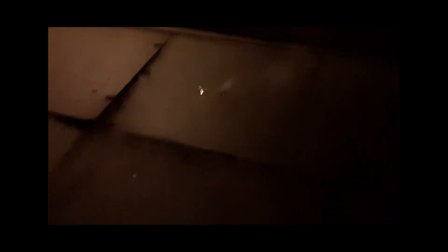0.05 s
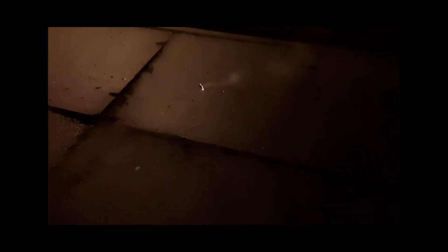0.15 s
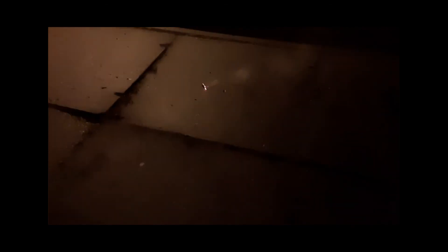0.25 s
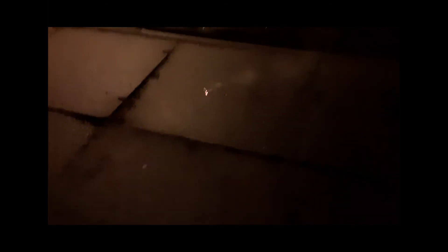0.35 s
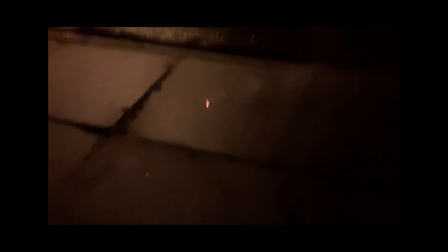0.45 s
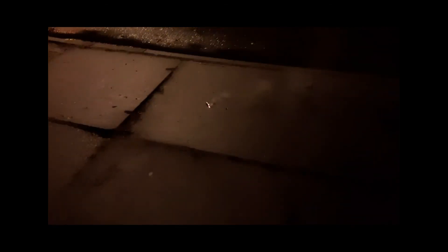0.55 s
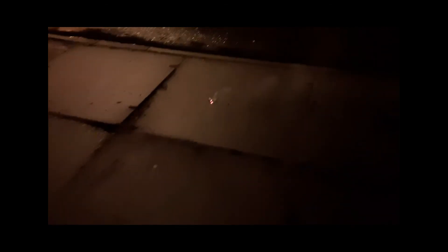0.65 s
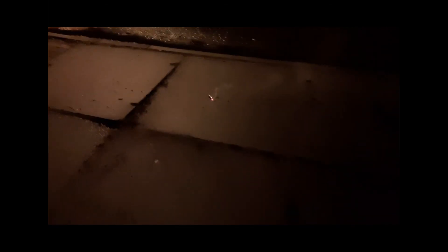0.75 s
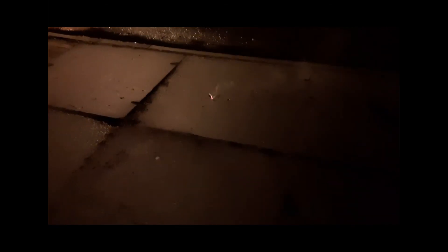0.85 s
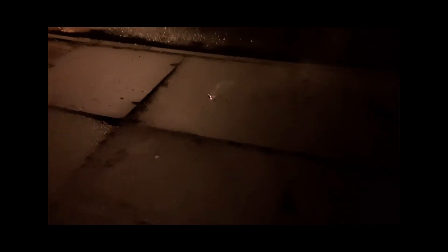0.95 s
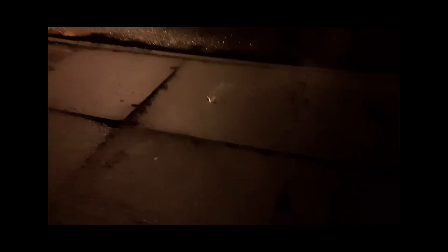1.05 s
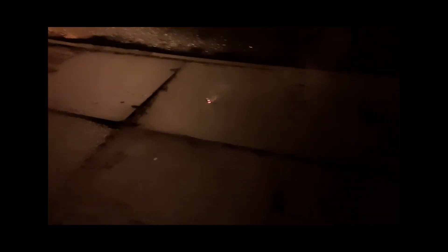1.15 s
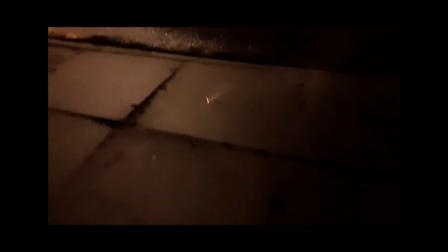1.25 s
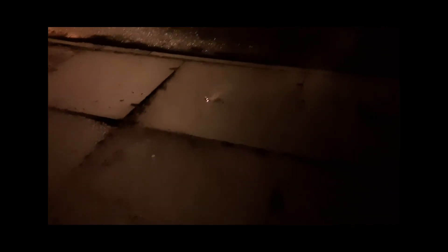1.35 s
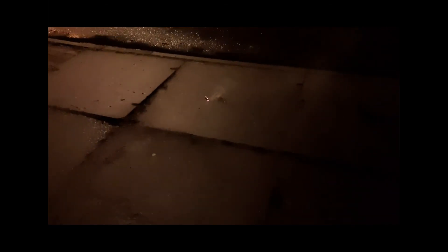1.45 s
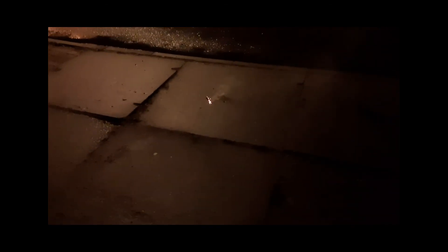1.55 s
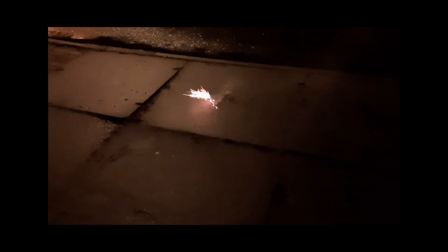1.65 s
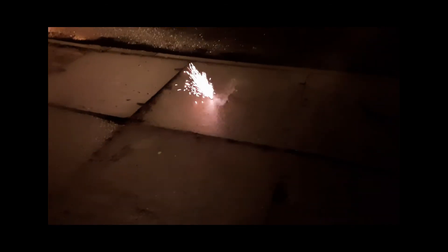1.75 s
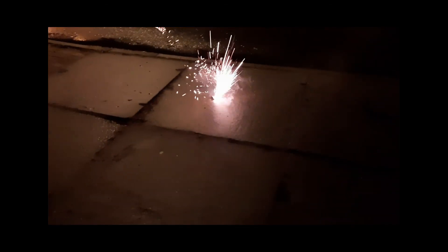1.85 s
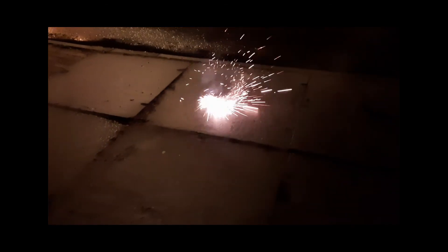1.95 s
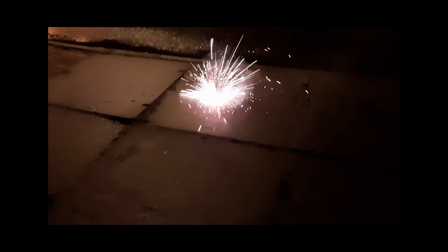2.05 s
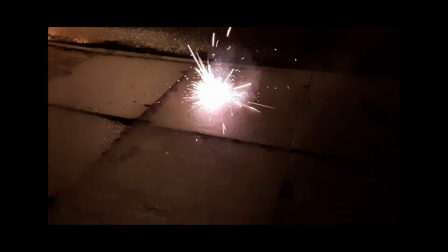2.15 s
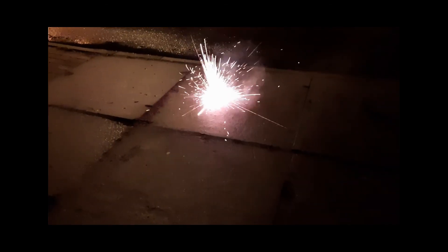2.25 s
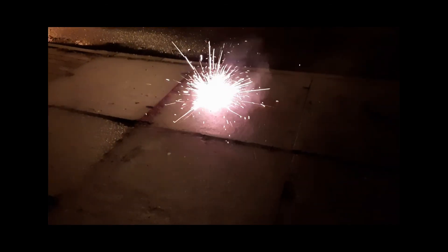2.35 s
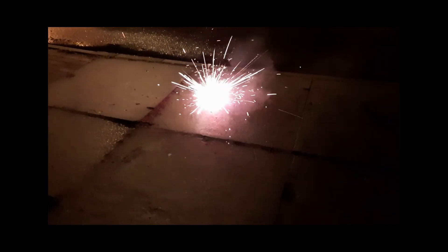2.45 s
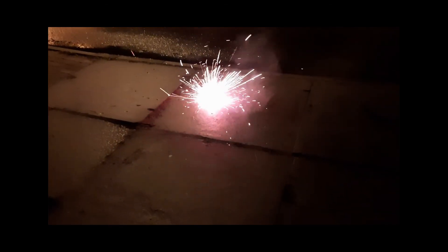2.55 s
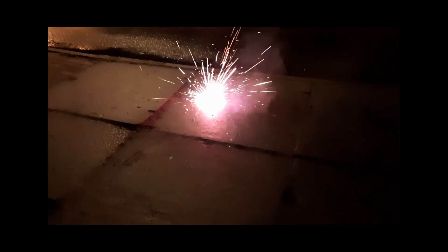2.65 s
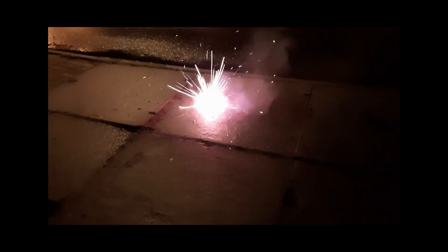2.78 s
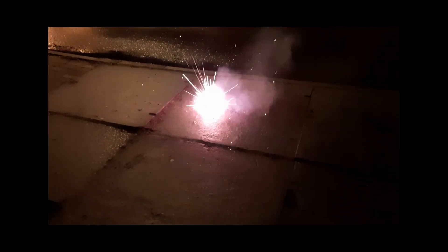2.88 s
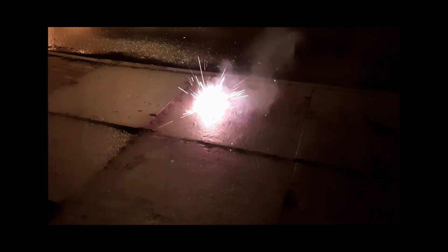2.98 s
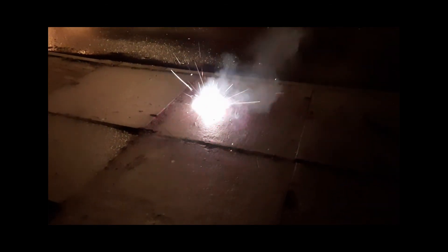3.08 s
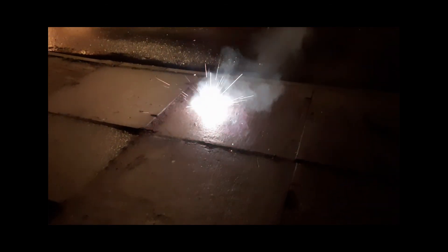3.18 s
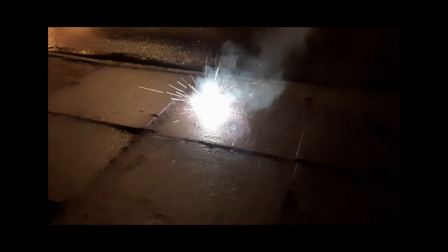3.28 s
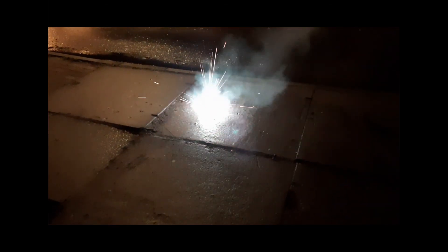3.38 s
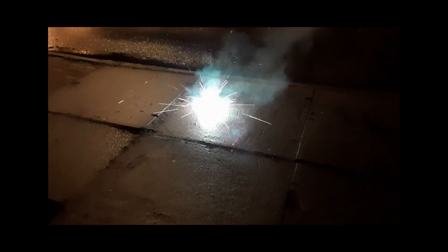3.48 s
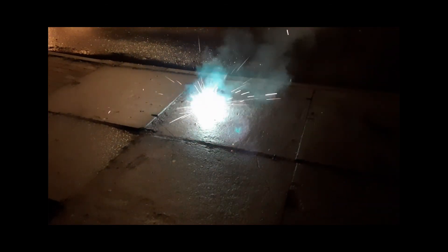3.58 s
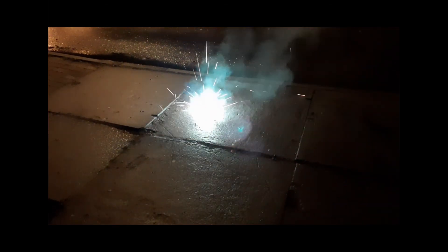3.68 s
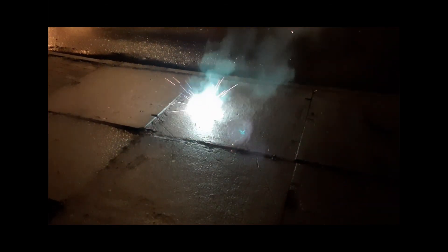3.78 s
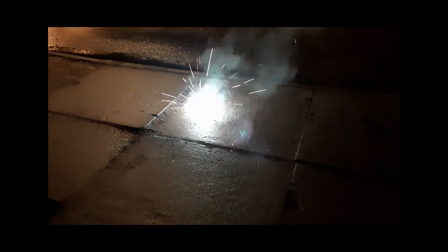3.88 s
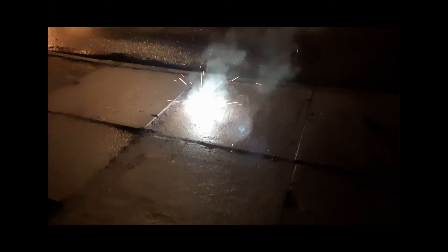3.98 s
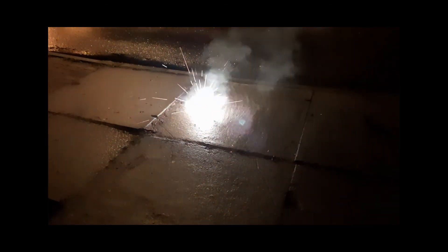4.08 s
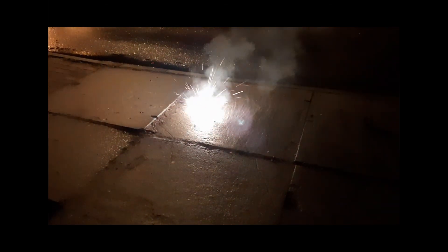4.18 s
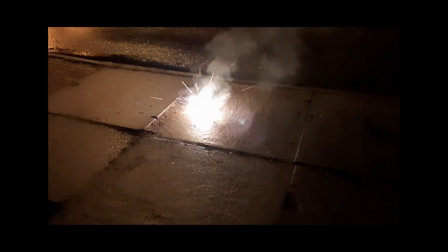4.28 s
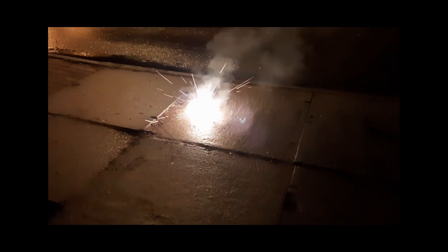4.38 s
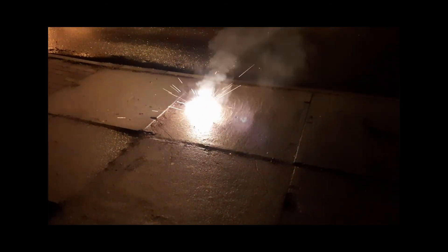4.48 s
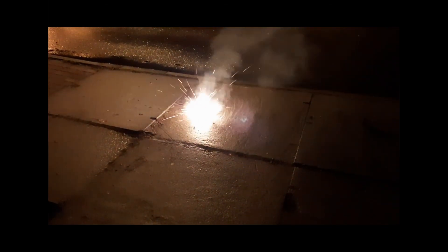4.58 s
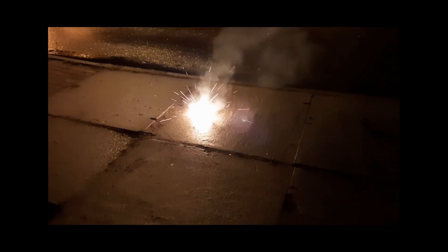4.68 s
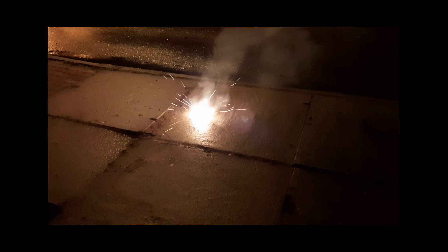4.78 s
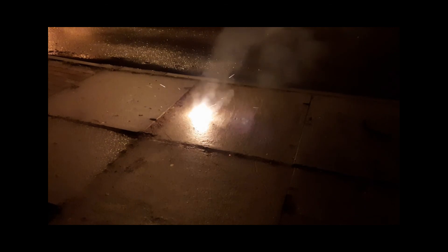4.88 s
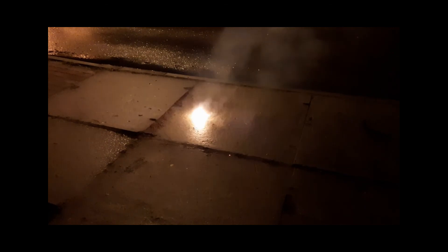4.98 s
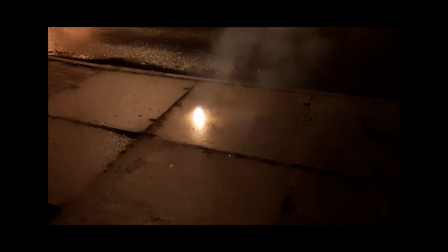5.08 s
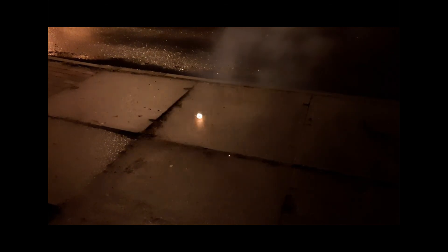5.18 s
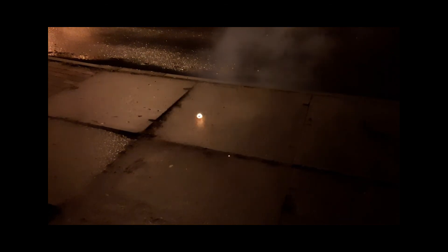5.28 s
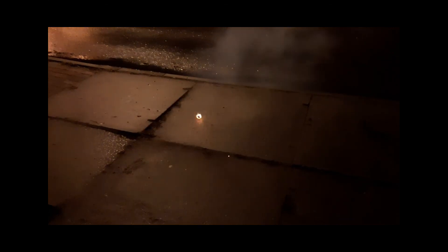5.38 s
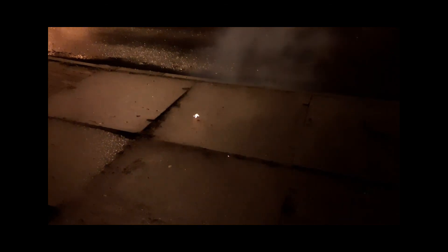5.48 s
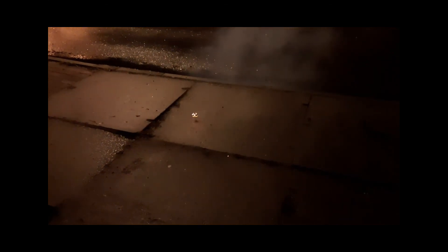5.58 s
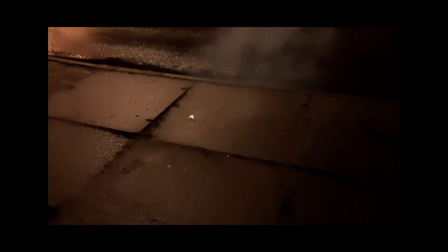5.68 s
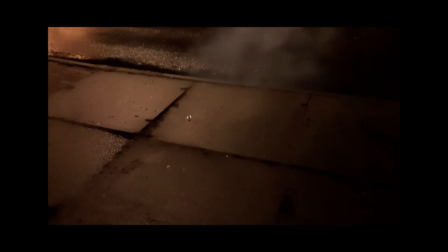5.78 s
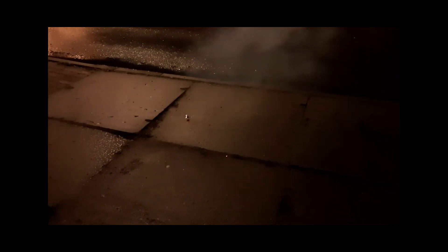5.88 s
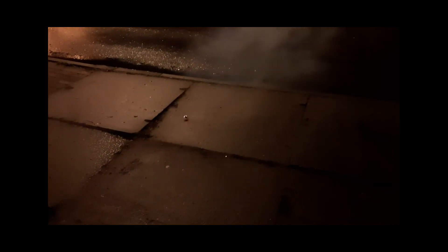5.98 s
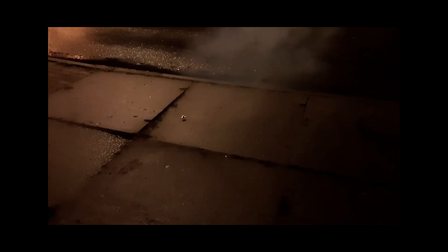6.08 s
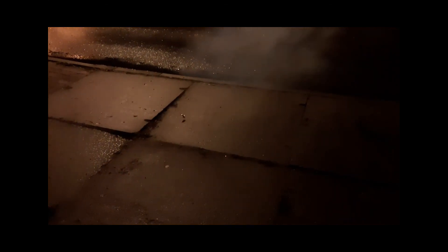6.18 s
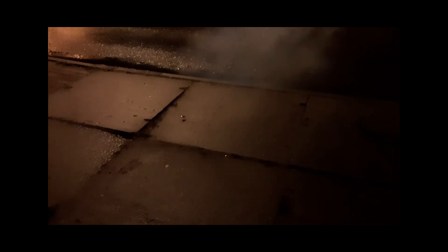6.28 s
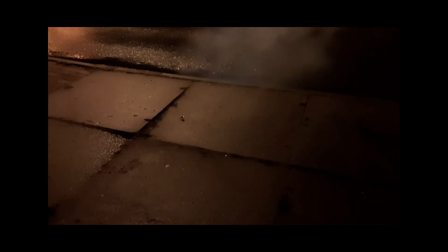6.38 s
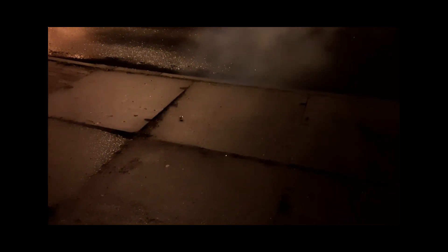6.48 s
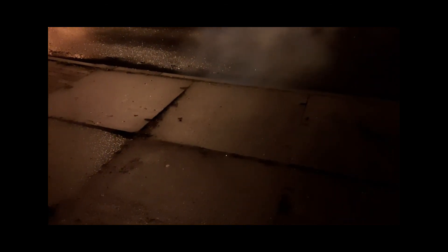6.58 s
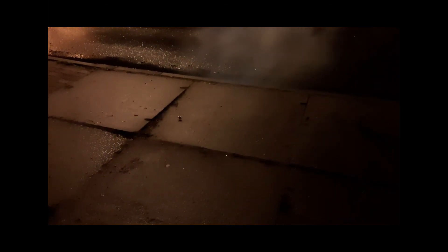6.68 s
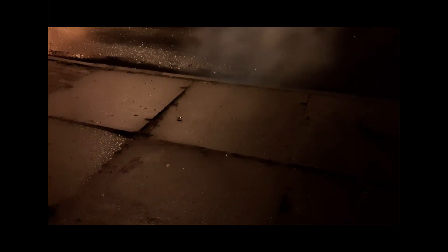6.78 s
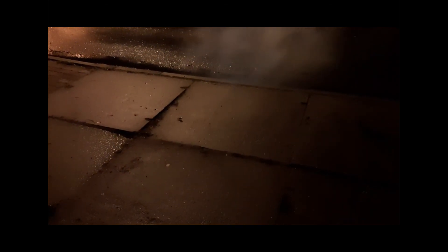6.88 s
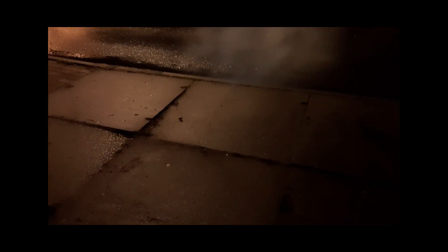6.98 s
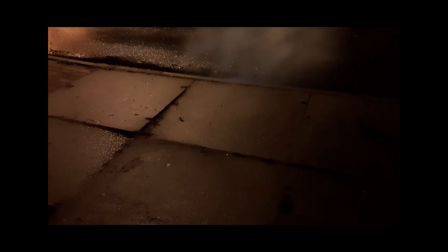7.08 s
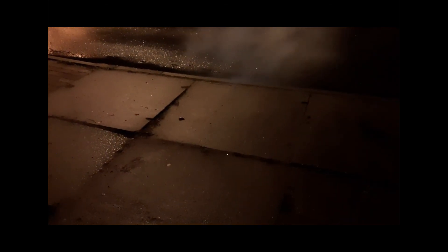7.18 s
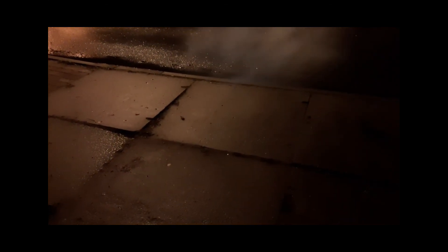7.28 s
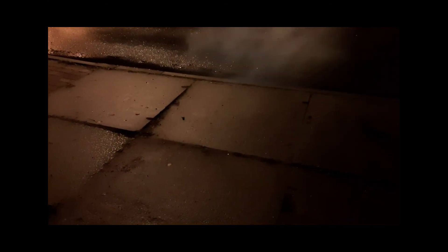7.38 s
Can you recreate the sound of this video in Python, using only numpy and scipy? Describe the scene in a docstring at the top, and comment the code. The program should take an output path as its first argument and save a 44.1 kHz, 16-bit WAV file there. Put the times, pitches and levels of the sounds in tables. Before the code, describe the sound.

A small spinning firework pops alight on wet paving, hisses and buzzes loudly in a fast whirl, then sputters out to faint ticks.

```python
"""Wet paving at night, where a ground spinner firework goes off: noise shaped by filters makes its gas, random impulses its sparks.
The fuse fizzes, the charge catches, and the tube tumbles, then spins up. Its hissing jet is modulated by each turn and wobble,
and sines locked to the rotation make a low hum. It dies to a fizzle and a few ticks, which are short ringing cracks of noise.
Wind buffets the two microphone ports in turn, as low noise and pressure pulses; a motor, a few sine lines, whines far away."""
import sys
import numpy as np
from scipy import signal
from scipy.fft import rfft, irfft, next_fast_len
from scipy.io import wavfile
from scipy.ndimage import map_coordinates

SR = 44100
rng = np.random.default_rng(int(sys.argv[2]) if len(sys.argv) > 2 else 0)


def wav_record(signal):
    """Record a signal, one row per channel, as 16-bit PCM in the file named by sys.argv[1]."""
    frames = np.transpose(np.atleast_2d(signal))
    bounded = np.clip(frames, -1, 1)
    # unit amplitude maps onto the largest positive 16-bit level
    quanta = np.round(bounded * 32767).astype(np.int16)
    wavfile.write(sys.argv[1], SR, quanta)


N = 328567

# rotation of the tube: (time [s], spin [turns/s])
SPIN_RATE = [(1.9, 24), (2.17, 31), (2.5, 112), (2.66, 151), (3.35, 164), (4.3, 149), (4.7, 141),
             (5.3, 120), (5.75, 100), (6.1, 90)]
# the strongest eddies of the wind:
# (time [s], relative level [dB], left minus right [dB], pitch of the pop [Hz])
WIND_EDDIES = [(.119, -27.5, -32, 168), (.178, -33.5, -20, 200), (.394, -26, -18, 195),
               (.581, -29.5, 25, 237), (.707, -33, 20, 170), (.735, -27.5, 20, 238), (.778, -44, 20, 300),
               (.877, -33.5, 20, 170), (.952, -29.5, 26, 290), (.991, -28, 23, 220),
               (1.007, -25.5, 27, 318), (1.051, -27, 23, 377), (1.077, -26.5, 7, 374),
               (1.148, -24.5, 24, 292), (1.222, -26, -14, 130), (1.241, -29.5, -14, 130),
               (1.259, -29.5, 0, 300), (1.345, -20.5, -25, 207), (1.479, -29.5, -20, 130),
               (1.543, -27.5, -20, 150), (1.89, -29, -25, 110), (4.264, -21, 19.5, 270),
               (4.328, -23.5, 18.5, 160.5), (4.449, -27.5, 12.5, 130), (5.142, -31, -12, 130),
               (5.248, -36.5, -17, 130), (5.808, -41.5, -13, 200), (6.282, -32.5, 27, 272),
               (7.001, -36, -25, 110), (7.393, -29, 9, 180)]
# spectrum of wind noise at a port: (frequency [Hz], relative density [dB])
WIND_SPECTRUM = [(20, -30), (45, -3.5), (75, 7.5), (120, -4), (220, -16), (350, -29.5), (700, -42),
                 (1500, -64), (3000, -96.5)]

WHIRL_S, WHIRL_RISE_S = 2.34, .14  # tumbling turns into whirling
LOPSIDED_S, LOPSIDED_RISE_S = 3.1, .8  # it wobbles more as it burns hollow
STALL_S, STALL_LENGTH_S = 4.9, .1  # too little thrust is left to keep it whirling
OUT_S, OUT_RELEASE_S = 6.15, .05  # the flame goes out


def amp(db):
    """Amplitude ratio of a level: 20 dB is a factor of ten."""
    return np.exp(np.asarray(db) * (np.log(10) / 20))


def unit(x):
    """Normalisation by the root mean square, to rms 1."""
    return x / np.sqrt(np.mean(x ** 2) + 1e-20)


def bell(u):
    """Gaussian bump of height 1 around u = 0."""
    return np.exp(-np.minimum(u * u, 20))


def ramp(start, length):
    """Linear onset from 0 to 1 over length seconds."""
    return np.clip((np.arange(N) / SR - start) / length, 0, 1)


def bump(s, length):
    """Gaussian in time, whose standard deviation is the half length [s]."""
    t = np.arange(N) / SR
    return bell((t - s) / length / np.sqrt(2))


def swells(rows):
    """Power addition of (time [s], level [dB], half length [s]) swells, returned as a gain."""
    return np.sqrt(sum((amp(db) * bump(s, length)) ** 2 for s, db, length in rows))


def bumps_db(rows):
    """Level addition of (time [s], lift [dB], half length [s]) bumps, returned in dB."""
    return sum(db * bump(s, length) for s, db, length in rows)


def along(points, hz):
    """Interpolation of (frequency [Hz], value) points on a log frequency axis."""
    f, v = np.transpose(points)
    return np.interp(np.log(hz + 1), np.log(f + 1), v)


def curve(rows):
    """Linear interpolation of (time [s], value) points at every sample."""
    s, values = np.transpose(rows)
    return np.interp(np.arange(N) / SR, s, values)


def wobble(rate):
    """Band-limited random fluctuation: a smooth curve through rate random knots a second."""
    at = np.linspace(0, N, int(8 * N * rate / SR) + 2)
    knots = rng.standard_normal(int(N * rate / SR) + 4)
    smooth = map_coordinates(knots, [at * rate / SR])
    return np.interp(np.arange(N), at, smooth)


def filtered(x, response):
    """Linear filtering: the spectrum of x times a response of frequency."""
    m = next_fast_len(N + 8192)
    return irfft(rfft(x, m) * response(np.fft.rfftfreq(m, 1 / SR)), m)[..., :N]


def changing(x, response):
    """Time-varying filtering: short-time spectra times a response of frequency and time."""
    hz, s, z = signal.stft(x, SR, nperseg=1024)
    return signal.istft(z * response(hz[:, None], s), SR, nperseg=1024)[1][:, :N]


def noise(spectrum, channels=2):
    """Spectral shaping of independent white noises, to rms 1 overall."""
    white = rng.standard_normal((channels, N))
    return unit(filtered(white, lambda hz: amp(along(spectrum, hz))))


def sparks(rate, spread_db):
    """Poisson-like impulses, rate a second per channel, whose exponential levels make a few much bigger."""
    place, sign, chance = rng.random((int(2 * rate * N / SR), 3)).T
    size_db = spread_db * np.minimum(-np.log(1 - chance), 3)
    size = (2 * sign - 1) * amp(size_db)
    return unit(np.bincount((place * 2 * N).astype(int), size, 2 * N).reshape(2, N))


def panned(db):
    """Level difference between the ports at constant power: left and right gains of mean power 1."""
    gains = amp(np.array([db, -db]) / 2)
    return gains / np.sqrt(np.mean(gains ** 2, axis=0))


def at_ports(pair):
    """Partial coherence: two independent signals become one source, with level and phase differences between ports."""
    # likeness of the ports: (frequency [Hz], correlation [-1 to 1])
    likeness = [(100, .85), (500, .97), (1800, .94), (3500, .9), (7000, .84), (8600, .65), (11000, .8),
                (15800, .78)]
    # level difference: (frequency [Hz], left minus right [dB])
    level_tilt = [(60, -14.5), (99, -8), (160, -4), (270, -0.5), (450, 1.5), (740, -3), (1220, -2),
                  (2010, -1), (3330, -1), (5500, -1.5), (9080, -3), (15000, -1.5)]
    # phase difference: (frequency [Hz], phase by which left leads [rad])
    phase_lead = [(100, 0), (1000, -.05), (1900, .1), (2600, .9), (3100, .2), (4600, .85), (6200, .3),
                  (7500, 1.6), (8700, .25), (10000, .6), (11500, 1.85), (15800, 2.4)]
    m = next_fast_len(N + 8192)
    hz = np.fft.rfftfreq(m, 1 / SR)
    common, diffuse = rfft(pair, m)
    turn = np.arccos(along(likeness, hz)) / 2
    mid, side = common * np.cos(turn), diffuse * np.sin(turn)
    skew = amp(along(level_tilt, hz) / 2) * np.exp(1j * along(phase_lead, hz) / 2)
    return irfft(np.array([(mid + side) * skew, (mid - side) / skew]), m)[:, :N]


def drifting(pair):
    """Time difference of arrival: the firework drifts left, so its sound leads more and more at the left port."""
    # bearing: (time [s], further delay by which left leads [samples])
    bearing = [(1.8, -.6), (2.5, -.1), (3.25, -.12), (3.8, .4), (4.85, .6), (5.3, .95), (5.9, 1.45)]

    def half_lead(hz, s):
        return np.pi * hz / SR * np.interp(s, *np.transpose(bearing))

    return changing(pair, lambda hz, s: np.exp(1j * np.multiply.outer([1, -1], half_lead(hz, s))))


def yard(x, wet_db=-12, t60=0.083):
    """Scattering from kerb and walls: a short decaying answer, which ripples the colour of a steady hiss."""
    t = np.arange(SR // 8) / SR
    tail = rng.standard_normal((2, len(t))) * amp(-60 * t / t60) * (t > .001)
    tail = amp(wet_db) * tail / np.linalg.norm(tail[0])
    return x + signal.fftconvolve(x, tail, axes=1)[:, :N]


def ringing(colour, hz, glide=1, left_share=0.77, right_share=1.2):
    """Resonance and interference on a broad colour; they stand out more at the right port."""
    # resonances of tube and paving, before each port's share:
    # (centre [Hz], half width [Hz], lift [dB])
    resonances = [(1744, 230, 6.5), (2550, 170, 0.5), (3290, 180, 6), (4000, 290, 6.5), (4800, 150, 2),
                  (5500, 150, 1), (6330, 190, 3), (7250, 500, 1.5)]
    # bands cancelled by the bounce off the paving, before each port's share:
    # (centre [Hz], half width [Hz], lift [dB])
    notches = [(770, 86, -3.5), (2090, 90, -3.5), (2940, 100, -3.5), (3620, 90, -2.5), (5210, 120, -5),
               (5880, 130, -5.5)]
    lift_db = sum(db * bell((hz / glide - centre) / width) for centre, width, db in [*resonances, *notches])
    return amp(along(colour, hz) + np.multiply.outer([left_share, right_share], lift_db))


def night():
    """Beating of slightly unsteady shaft harmonics: a far motor fades in and out on the wind, over quiet town air."""
    # spectrum of the air: (frequency [Hz], relative density [dB])
    air_spectrum = [(100, -1.5), (200, -9.5), (350, -16), (700, -16.5), (1050, -23), (1600, -22.5),
                    (2500, -31.5), (4000, -31.5), (6500, -31.5), (8400, -48.5), (11000, -34),
                    (15800, -27.5)]
    # lines of the whine, as multiples of the shaft speed
    harmonics = (12, 14, 15, 16)
    # the wind carries the motor over: (time [s], half length [s],
    # then one relative level [dB] for each of the four lines)
    motor_swells = [(.05, 0.17, -88, -82, -75.5, -82), (.4, .17, -88, -82, -86, -77.5),
                    (1.38, .24, -84, -70, -80, -82), (6.0, .5, -90, -90, -78, -85.5),
                    (7.2, .42, -83, -73, -71, -71)]
    shaft_hz = 49.2 + 0.06 * wobble(6)
    shaft = 2 * np.pi * np.cumsum(shaft_hz) / SR
    s, length, *line_dbs = np.transpose(motor_swells)
    whine = 0
    for k, db in zip(harmonics, line_dbs):
        line = np.sin(k * shaft + 2 * np.pi * rng.random())
        whine = whine + swells(zip(s, db, length)) * amp(wobble(4)) * line
    *apart, shared = noise(air_spectrum, channels=3)
    return amp(-4.0) * whine + amp(-66.5) * np.array(apart) + amp(-76.5) * shared


def wind():
    """Turbulent pressure noise: a light breeze, and gusts that each catch one port more than the other."""
    # gusts: (time [s], level [dB], half length [s], left minus right [dB])
    gusts = [(.06, -41, 0.16, -22), (0.133, -35.5, 0.0073, -27), (0.513, -45, 0.033, -4),
             (0.724, -35.5, 0.02, 21), (1.017, -37, 0.084, 22), (1.258, -32, 0.054, -5),
             (1.476, -44, 0.13, -12), (1.586, -41, 0.018, -4), (1.687, -41.5, 0.034, -12),
             (4.32, -39.5, 0.09, 9.5), (5.133, -46, .04, -12), (5.72, -50, 0.1, -18), (6.269, -51, .05, 13),
             (6.881, -52.5, 0.15, -22), (7.43, -41, 0.12, -3.5)]
    breeze_db, breeze_pan_db = -57, -9  # between gusts
    power = (amp(breeze_db) * panned(breeze_pan_db)[:, None]) ** 2
    for s, db, length, pan_db in gusts:
        power = power + (panned(pan_db)[:, None] * swells([(s, db, length)])) ** 2
    lumps = amp(3 * np.array([wobble(16), wobble(16)]))
    return np.sqrt(power) * unit(lumps * noise(WIND_SPECTRUM))


def buffets(rise=0.005, thud_hz=110, trail_db=-11, trail_s=0.02):
    """Pressure of a passing eddy: a damped low swing that swells and dies, trailing a ragged rumble."""
    t = np.arange(SR // 8) / SR
    out = np.zeros((2, N + SR))
    rumble = noise(WIND_SPECTRUM, channels=1)[0]
    for s, db, pan_db, _ in WIND_EDDIES:
        pitch = thud_hz * np.exp(0.18 * rng.standard_normal())
        phase = 2 * np.pi * rng.random()
        swell = (t / rise) ** 2 * np.exp(2 - 2 * t / rise)
        thud = swell * np.sin(2 * np.pi * pitch * t + phase)
        excerpt = rumble[rng.integers(N - len(t)):][:len(t)]
        trail = amp(trail_db) * t / trail_s * np.exp(1 - t / trail_s) * excerpt
        out[:, round(s * SR):][:, :len(t)] += amp(db - 3.0) * panned(pan_db)[:, None] * (thud + trail)
    return out[:, :N]


def pops(wake_db=-9, wake_length=0.014):
    """Suction of a vortex core: a brief negative pulse at the port, inside a ragged wake."""
    # spectrum of the wake: (frequency [Hz], relative density [dB])
    wake_spectrum = [(80, -9.5), (160, 1), (260, 5), (400, -14.5), (700, -25), (1200, -33.5), (2500, -49.5),
                     (5000, -81)]
    delay_s, pop_db, db_per_octave, ref_hz = .007, -9, 8, 260  # smaller, faster eddies pop harder
    out, wake = np.zeros((2, N)), noise(wake_spectrum)
    offsets = np.arange(-(SR // 25), SR // 25)
    t = offsets / SR
    for s, db, pan_db, hz in WIND_EDDIES:
        near = round((s + delay_s) * SR) + offsets
        u = (np.pi * hz * t) ** 2
        core = (2 * u - 1) * np.exp(-u)
        eddy = core + amp(wake_db) * np.exp(-(t / wake_length) ** 2) * wake[:, near]
        level_db = db + pop_db + db_per_octave * np.log2(hz / ref_hz)
        out[:, near] += amp(level_db) * panned(pan_db)[:, None] * eddy
    return out


def smoulder():
    """Residual crackle: with the flame out, the hot casing fizzes faintly on the wet stone, decaying steadily in dB."""
    # spectrum: (frequency [Hz], relative density [dB])
    smoulder_spectrum = [(500, -21), (1400, -11.5), (1900, 1.5), (2600, -11.5), (4000, -11), (7000, -10),
                         (8600, -27.5), (12000, -13.5), (15800, -12.5)]
    start_db, fade_db_per_s = -70, 25.5
    level_db = start_db - fade_db_per_s * np.maximum(np.arange(N) / SR - OUT_S, 0)
    crackle = rng.standard_normal((2, N)) + amp(-3.5) * sparks(rate=150, spread_db=3.5)
    fizz = unit(filtered(at_ports(crackle), lambda hz: amp(along(smoulder_spectrum, hz))))
    return ramp(OUT_S, OUT_RELEASE_S) * amp(level_db) * fizz


def spits(echo_db=-21, echo_t60=0.092):
    """Impulsive excitation of a resonance: each crack rings and draws a faint answer from the yard; random ticks follow the flame."""
    # sharp spits of fuse and charge, and ticks of the cooling tube:
    # (time [s], relative level [dB], ring [Hz])
    spit_events = [(.628, -57, 2600), (.7375, -54, 5500), (.7647, -51, 4800), (1.0784, -55, 4600),
                   (1.126, -55, 5000), (1.1693, -53, 2400), (1.3084, -53.5, 2900), (1.6457, -43.5, 3500),
                   (1.7495, -28.5, 3600), (6.1482, -45, 3850), (6.2931, -47, 1790), (6.3195, -56, 1740),
                   (6.3779, -52, 1720), (6.4867, -53.5, 1900), (6.52, -60.5, 1800), (6.7715, -51, 3600),
                   (6.8044, -54, 1910), (6.853, -60.5, 4600), (7.1352, -59, 1100), (7.23, -59, 1840),
                   (7.3482, -55.5, 3600)]
    # spectrum of a crack: (frequency [Hz], relative density [dB])
    crack_spectrum = [(300, -9.5), (1100, -4), (1800, -0.5), (2600, -7.5), (3700, -2.5), (6500, -10),
                      (8600, -22), (12000, -11), (15800, -13)]
    ring_db, ring_octaves = 9.5, .25  # height and half width of the ring
    t60 = .011
    t = np.arange(SR // 8) / SR
    shape = amp(-60 * t / t60) + amp(echo_db - 60 * t / echo_t60)
    hz, out = np.fft.rfftfreq(len(t), 1 / SR), np.zeros((2, N + SR))
    ticks = []  # mostly fainter, while the tube cools
    for _ in range(12):
        ticks.append((rng.uniform(OUT_S, N / SR), rng.normal(-66, 1.5), 2200 * rng.lognormal(0, .4)))
    for s, db, ring_hz in [*spit_events, *ticks]:
        ring = ring_db * bell(np.log2((hz + 1) / ring_hz) / ring_octaves)
        colour = amp(along(crack_spectrum, hz) + ring)
        crack = shape * irfft(rfft(rng.standard_normal((2, len(t)))) * colour, len(t))
        crack *= np.linalg.norm(shape) / np.linalg.norm(crack[0])
        out[:, round(s * SR):][:, :len(t)] += amp(db) * crack
    return amp(-5.5) * at_ports(out[:, :N])


def fuse():
    """Combustion noise in soft spurts, with a little crackle, until the charge takes over."""
    # spurts: (time [s], relative level [dB], half length [s])
    spurts = [(.49, -63.5, .042), (.75, -73, 0.069), (.99, -73, 0.099), (1.32, -66, 0.12),
              (1.64, -68, 0.051)]
    # spectrum: (frequency [Hz], relative density [dB])
    fuse_spectrum = [(600, -36), (1500, -3), (2800, -10), (3700, 0), (5500, 0), (7000, -4), (8600, -23),
                     (10500, -11), (13000, -8), (15500, -5)]
    steady = amp(-85)  # the fizz between spurts
    level = np.hypot(swells(spurts), steady) * (1 - ramp(1.7, .05))
    fizz = rng.standard_normal((2, N)) + amp(-8.5) * sparks(rate=70, spread_db=4.5)
    fizz = unit(filtered(at_ports(fizz), lambda hz: amp(along(fuse_spectrum, hz))))
    return amp(2.0) * level * fizz


def plug(s=1.7505, db=-33, hz=750, t60=0.0093):
    """Damped oscillation of a cavity: rising pressure clears the nozzle with one small, hollow pop."""
    t = np.arange(SR // 20) / SR
    out = np.zeros(N)
    out[round(s * SR):][:len(t)] = amp(db - 60 * t / t60) * np.sin(2 * np.pi * hz * t)
    return out


def ember(turns, flutter_db=1.5, flutter_db_per_s=2.0):
    """Amplitude modulation by the coasting tube: a weak, sputtering fizzle dulls and flutters more as it fades."""
    # strength of the fizzle: (time [s], relative level [dB])
    fizzle_level = [(5.25, -45.5), (5.37, -50), (5.46, -51), (5.6, -54.5), (5.64, -58), (5.715, -54.5),
                    (5.75, -58), (5.86, -58.5), (5.9, -61), (5.96, -62), (6.03, -62), (6.12, -67.5)]
    # last crumbs of powder flare, the final one as it goes out:
    # (time [s], relative level [dB], half length [s])
    sputters = [(5.413, -49, .003), (5.549, -52.5, .003), (5.697, -54.5, .003), (5.711, -51, .002),
                (5.723, -52, .002), (5.735, -52, .002), (5.834, -55.5, .0025), (5.857, -55, .002),
                (5.975, -61.5, .003), (6.045, -56.5, 0.0031), (6.085, -63, .004), (6.151, -52, .004)]
    # spectrum: (frequency [Hz], relative density [dB])
    ember_spectrum = [(200, -18), (500, -9.5), (1300, -8), (2000, -4.5), (2700, -1), (3000, -4), (3400, 1),
                      (4300, -3.5), (5300, -4.5), (7000, -7.5), (8500, -22), (10500, -15), (15800, -15)]
    start_s = 5.24
    bright_db, dulling_db_per_s, treble_hz = 5.5, 11.5, 5400  # its treble dies first
    alight = ramp(start_s - .1, .1) - ramp(OUT_S, OUT_RELEASE_S)
    age = np.maximum(np.arange(N) / SR - start_s, 0)
    gas = rng.standard_normal((2, N)) + amp(-3.5) * sparks(rate=240, spread_db=2.0)
    swing_db = flutter_db + flutter_db_per_s * np.minimum(age, 1)
    gas *= amp(swing_db * np.cos(turns * 3 / 4) + 1.0 * wobble(60) + 1.3 * wobble(250))
    fizzle = unit(filtered(yard(at_ports(gas)), lambda hz: ringing(ember_spectrum, hz)))
    dull = filtered(fizzle, lambda hz: 1 / (1 + (hz / treble_hz) ** 10))
    treble = amp(bright_db - dulling_db_per_s * age) * (fizzle - dull)
    level = np.hypot(amp(curve(fizzle_level)), swells(sputters))
    return alight * level * (dull + treble)


def by_speed(at_top, shortfall):
    """Speed dependence: at_top at top spin, growing linearly by shortfall towards standstill."""
    spin = curve(SPIN_RATE)
    return at_top + shortfall * (1 - spin / spin.max())


def whirl():
    """Steadiness of rotation, 0 to 1: from the end of the tumble until the tube stalls."""
    return ramp(WHIRL_S, WHIRL_RISE_S) - ramp(STALL_S, STALL_LENGTH_S)


def hum(turns):
    """Periodic forcing of the air, once a turn and once a wobble: partials, buzzier in spin-up, blurred by phase skids."""
    # partials; the tube wobbles three times in four turns: (multiple of the spin,
    # relative level [dB], added while spinning up [dB], added once lopsided [dB])
    partials = [(3 / 4, -8.5, 0, 3), (1, -.5, -2.5, -3), (3 / 2, -9.5, 8.5, 3.3), (7 / 4, -15, 0, -4.5),
                (9 / 4, -17.5, 11, 3)]
    start_s, rise_s = 2.3, .1  # fast enough to hum
    spun_up_s, settle_s = 2.55, 0.18  # the tube settles into its spin
    peak_s, hum_db, sag_db_per_s2 = 3.05, -40, 2  # the hum arches over the burn
    level_db = hum_db - sag_db_per_s2 * (np.arange(N) / SR - peak_s) ** 2
    skid_radians = by_speed(.1, .4)
    spinning_up = 1 - ramp(spun_up_s, settle_s)
    lopsided = ramp(LOPSIDED_S, LOPSIDED_RISE_S)
    tone = 0
    for k, db, early_db, late_db in partials:
        partial_db = db + early_db * spinning_up + late_db * lopsided + 2.0 * wobble(11)
        tone = tone + amp(partial_db) * np.sin(k * (turns + skid_radians * wobble(35)))
    return (ramp(start_s, rise_s) - ramp(STALL_S, STALL_LENGTH_S)) * amp(level_db) * tone


def powder_colour():
    """Layered combustion: sizzle and highest fizz in dB, as the flame passes from layer to layer."""
    # layers in the order they burn:
    # (time reached [s], sizzle relative to hiss [dB], highest fizz relative to hiss [dB])
    layers = np.array([(1.64, -17, -4.5), (1.86, -11, -6.5), (2.62, -7.5, -5.5), (3.58, -9.5, -10),
                       (4.68, -15, -17), (5.12, -9.5, -15)])
    blend_s = 0.12  # one layer burns into the next
    levels = layers[0, 1:, None]
    for s, step in zip(layers[1:, 0], np.diff(layers[:, 1:], axis=0)):
        levels = levels + step[:, None] * ramp(s - blend_s / 2, blend_s)
    return levels


def burning():
    """Ignition and burnout: the charge catches at once and gives out more slowly."""
    return ramp(1.635, .03) - ramp(5.18, 0.14)


def facing(turns, tumble_s):
    """Directivity of a rotating source: level in dB as the nozzle sweeps round, less steady at low speed."""
    turn_db = whirl() * by_speed(1.17, 2)
    lopsided_db = 1.06 * ramp(LOPSIDED_S, LOPSIDED_RISE_S)
    wobble_db = whirl() * (by_speed(1.47, 3.5) + lopsided_db)
    facing_db = turn_db * np.cos(turns) + wobble_db * np.cos(turns * 3 / 4)
    facing_db -= (turn_db ** 2 + wobble_db ** 2) * np.log(10) / 40  # sweeping adds no power
    tumbling = ramp(tumble_s, .05) - ramp(WHIRL_S, WHIRL_RISE_S)
    return facing_db + 0.5 * tumbling * wobble(70)  # the hiss jolts


def jet(turns):
    """Turbulent jet noise: gas and sparks rush from the nozzle, louder each time it points this way."""
    # thrust: (time [s], relative hiss level [dB])
    thrust = [(1.645, -55.5), (1.7, -45.5), (1.84, -35.5), (1.92, -31), (2.2, -29.5), (2.42, -28),
              (2.55, -25), (2.67, -29), (2.98, -27.5), (3.2, -25.5), (3.36, -27.5), (4.7, -26.5),
              (5.04, -33), (5.135, -38), (5.165, -42.5), (5.25, -44.5)]
    # brief bursts of the hiss: flares as the tube tumbles and spins up, later sharp spark cracks:
    # (time [s], lift [dB], half length [s])
    bursts = [(1.917, 2, .004), (1.966, 8.5, 0.016), (1.989, 4.5, .005), (2.028, 5, .009),
              (2.072, 6.5, .005), (2.107, 11, 0.005), (2.155, 5, .005), (2.184, 4, .003), (2.209, 5, .003),
              (2.228, 8.5, .003), (2.257, 7.5, .004), (2.279, 5.5, .003), (2.297, 5, .003),
              (2.31, 6.5, .004), (2.335, 5, .003), (2.35, 3.5, .002), (2.367, 3.5, .002),
              (2.377, 7.5, .002), (2.397, 6, .0025), (2.42, 4.5, .002), (2.429, 4.5, .002),
              (2.448, 5, .002), (2.469, 5, .003), (3.725, 3, .002), (3.776, 3.5, .002), (4.062, 3.5, .002),
              (4.121, 4, .002), (4.226, 5, .002), (5.04, 5, .002)]
    # the roar flares as the charge gives out, and ends in a puff:
    # (time [s], lift [dB], half length [s])
    gasps = [(5.037, 5, 0.048), (5.089, 10.5, 0.014), (5.126, 12.5, .016), (5.176, 20, 0.0057)]
    # broad spectrum of the jet: (frequency [Hz], relative density [dB])
    jet_spectrum = [(50, -15), (130, -9.5), (270, -7), (400, -18), (560, -11.5), (800, -12.5),
                    (1300, -15.5), (2600, -8), (4500, -4.5), (7000, -1), (8600, -13.5), (10800, -0.5),
                    (13000, -5.5), (15800, -6)]
    # the tube skitters and the bounce off the paving changes:
    # (time [s], pitch of resonances and notches [ratio])
    ring_glide = [(2.4, .967), (3, 1), (4.7, 1.015)]

    hiss_db = curve(thrust) + bumps_db(bursts)
    gasp_db = bumps_db(gasps)
    sizzle_db, fizz_db = powder_colour()
    facing_db = facing(turns, tumble_s=bursts[0][0])
    sputter_db = .3 * wobble(12) + .6 * wobble(45) + 1.1 * wobble(320)  # the powder burns unevenly
    gas = rng.standard_normal((2, N)) + amp(-11.5) * sparks(rate=500, spread_db=4)
    rush = yard(at_ports(gas * amp(facing_db + sputter_db)))
    rush = changing(rush, lambda hz, s: ringing(jet_spectrum, hz, np.interp(s, *np.transpose(ring_glide))))

    def below(hz, edge_hz):
        return 1 / (1 + (hz / edge_hz) ** 20)

    def band(lo_hz, hi_hz):
        part = filtered(rush, lambda hz: below(hz, hi_hz) - below(hz, lo_hz))
        return part / np.std(part.mean(axis=0)) * amp(0.75 * wobble(70))

    deep_hz, low_hz, body_hz, keen_hz, high_hz, highest_hz = 400, 1450, 2800, 5200, 8600, 11800  # band edges
    # the hiss starts soft and turns keen as the pressure builds
    keen_db = -5.5 * (1 - ramp(1.76, .12))
    hiss = amp(by_speed(-12.5, 6.5)) * band(low_hz, body_hz)  # its hollow body
    hiss = hiss + amp(-3.5) * band(body_hz, keen_hz)
    hiss = hiss + amp(keen_db - 3.5) * band(keen_hz, high_hz)
    # the deepest part builds as the tube gets going
    rumble = amp(0.87 * gasp_db - 3.5) * ramp(1.7, 0.39) * band(32, deep_hz)
    roar = amp(by_speed(-17.5, 5.5)) * (rumble + amp(gasp_db) * band(deep_hz, low_hz))
    sizzle = amp(sizzle_db + 0.46) * band(high_hz, highest_hz)
    fizz = amp(fizz_db + 3.5 + 1.2 * wobble(12)) * band(highest_hz, SR / 2)
    return burning() * amp(hiss_db - 0.41) * (roar + hiss + sizzle + fizz)


def scene():
    """Superposition of sources: the firework a few steps away, in wind."""
    turns = 2 * np.pi * np.cumsum(curve(SPIN_RATE)) / SR  # angle [rad]
    background = night() + wind() + buffets() + pops()
    firework = smoulder() + spits() + fuse() + plug() + ember(turns) + hum(turns) + jet(turns)
    return background + drifting(firework)


def record(dry):
    """Soft saturation and band limiting: the recorder rounds off the highest peaks and keeps nothing above its limit."""
    ceiling, top_hz = .47, 15850
    rounded = dry / (1 + (dry / ceiling) ** 4) ** (1 / 4)
    return filtered(rounded, lambda hz: hz < top_hz)


dry = scene()
out = record(dry)
wav_record(out)
```